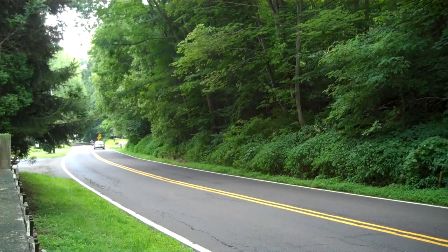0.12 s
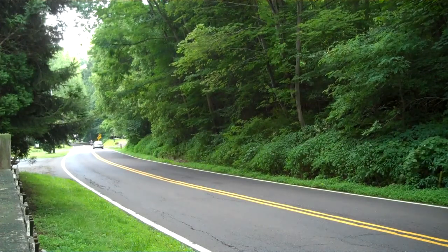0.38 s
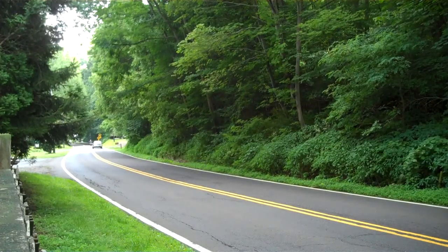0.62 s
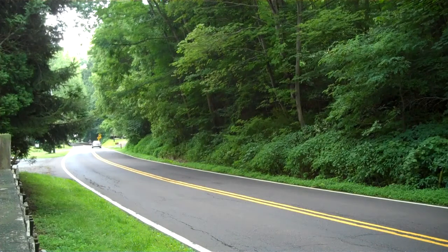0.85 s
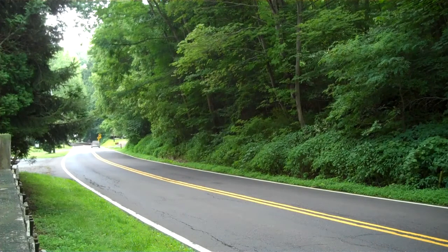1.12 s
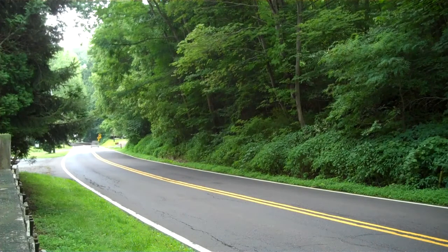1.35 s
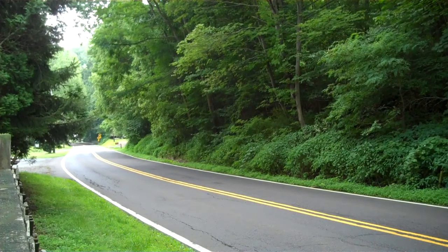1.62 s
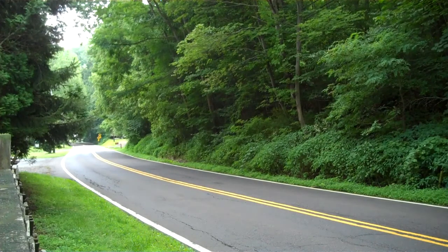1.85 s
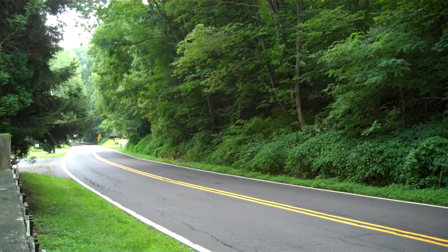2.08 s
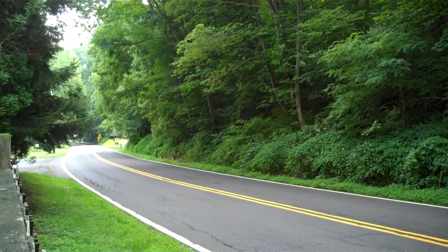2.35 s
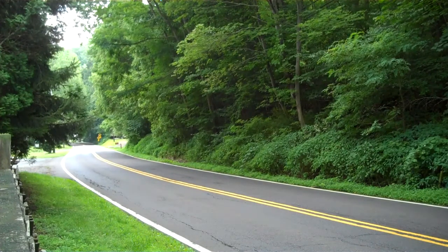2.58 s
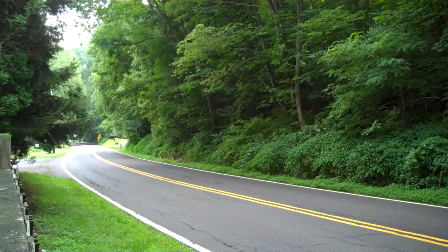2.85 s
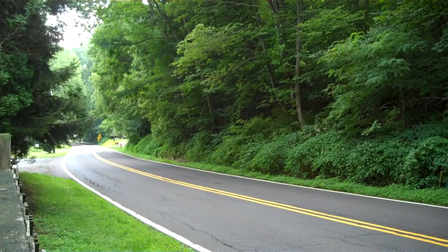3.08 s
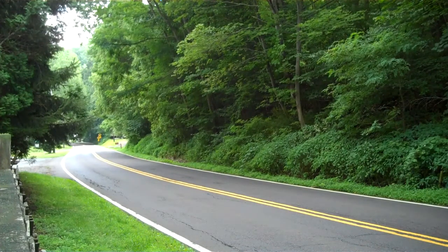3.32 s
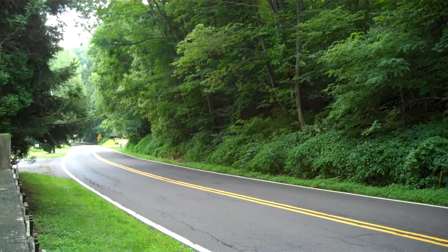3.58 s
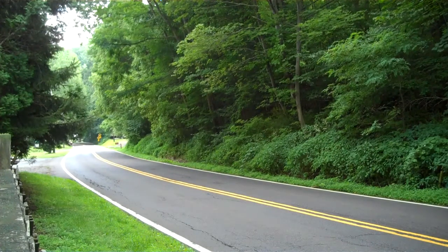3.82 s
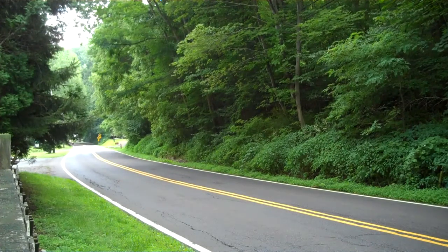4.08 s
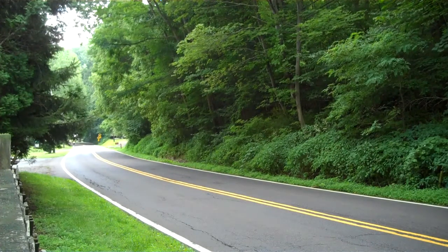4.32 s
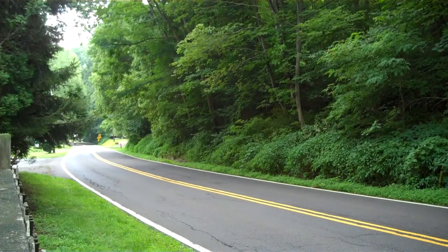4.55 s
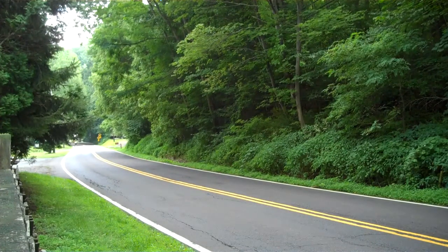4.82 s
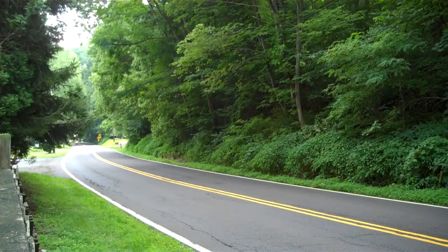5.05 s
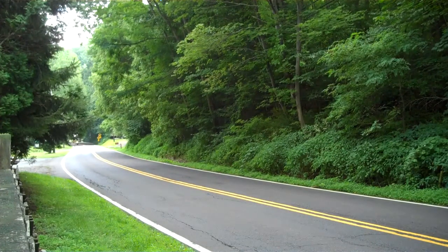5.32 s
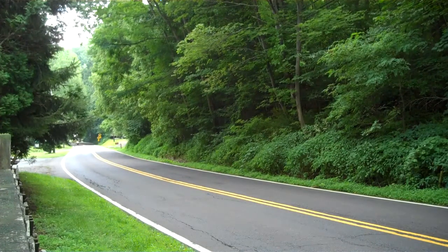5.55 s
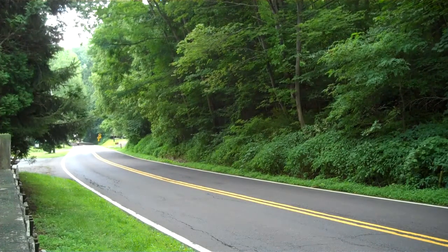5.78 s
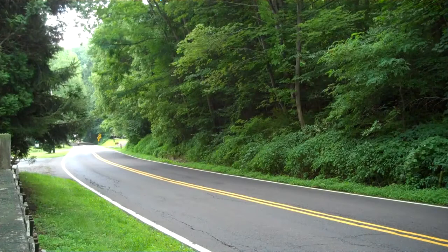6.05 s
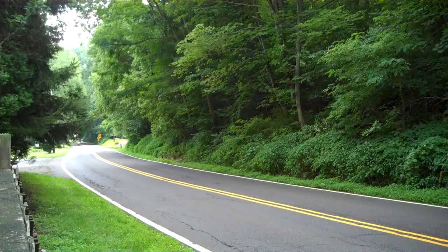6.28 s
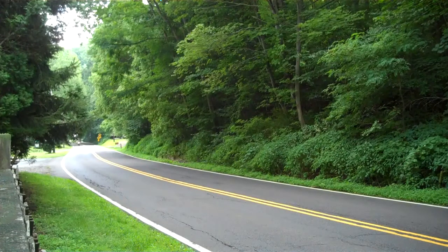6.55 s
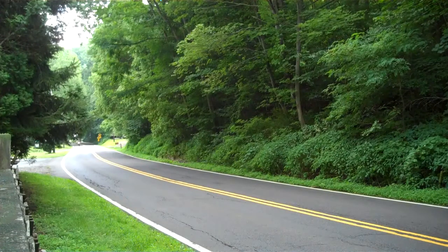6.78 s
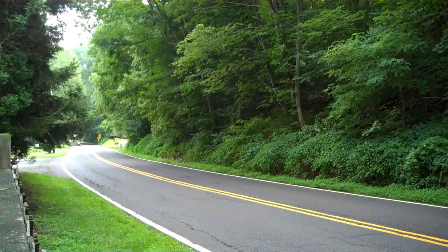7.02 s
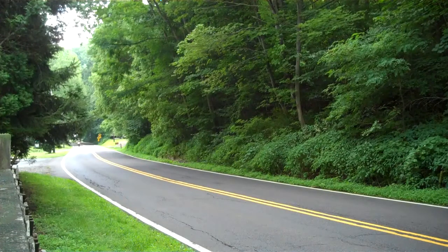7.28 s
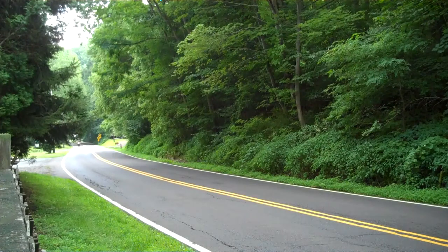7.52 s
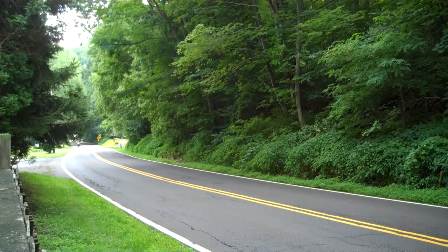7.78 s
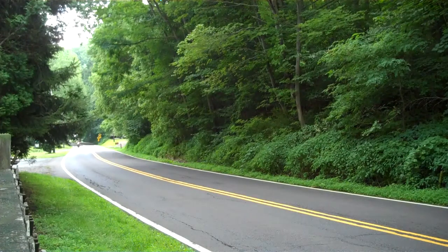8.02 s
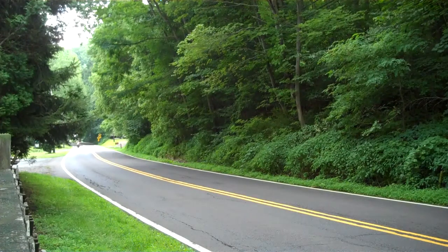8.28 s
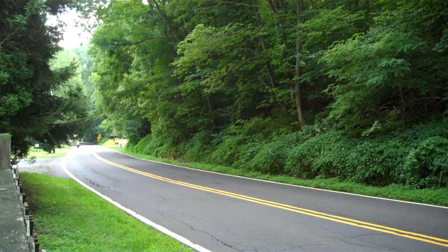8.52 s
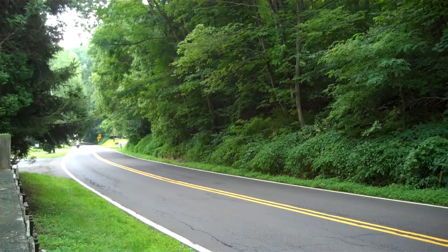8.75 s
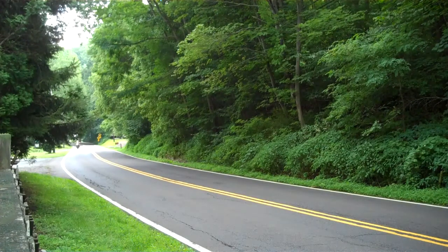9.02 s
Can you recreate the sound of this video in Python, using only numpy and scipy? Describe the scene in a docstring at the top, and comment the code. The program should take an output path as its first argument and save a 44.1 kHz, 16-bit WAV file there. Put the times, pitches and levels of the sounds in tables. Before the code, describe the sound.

A roadside in leafy woods, heard by a small fixed stereo microphone. From 0 s a car's tyres roar, a broad midrange wash around 1 to 2 kHz with bright spray near 6 to 8 kHz, low engine tones and a brief hum sliding slightly down. It sinks a little, then between 0.9 and 1.9 s crossfades away. Left is a steady high hiss of insects and leaves, slowly thinning, brighter in pitch on the left, over faint far rumble. A distant motorcycle drones at about 57 turns per second, wavering, pitch creeping up until 5 s then easing down. From about 4 s its roar and rumble swell, and gear whine emerges. A second, slower engine throbs low and uneven, clearly stronger by 5 s, its pitch peaking near 6 s. Both remain near the centre; the motorcycle is loudest from 8 to 9 s, still approaching when the sound ends.

```python
"""Tyres roar first, with a spray of treble, from a car on a wooded road, then crossfade into a second passage.
There a motorcycle and a second engine draw nearer: steady engine tones, made of sine waves, over a soft roar
and rumble of shaped noise. Insects and leaves hiss in two bands of noise that thin slowly, ringing at a
different pitch in each microphone port of a small stereo camera."""
import sys
import numpy as np
from scipy import signal
from scipy.fft import rfft, irfft
from scipy.io import wavfile
from scipy.ndimage import uniform_filter1d

SR = 44100
rng = np.random.default_rng(int(sys.argv[2]) if len(sys.argv) > 2 else 0)


def transcribe(u):
    """Save the signal u as a 16-bit wav file named by the first command-line argument.

    u: samples, shape (n,) or (channels, n), limited to [-1, 1]; the rate is SR.
    q: integer samples, one column per channel.
    """
    v = np.clip(np.atleast_2d(u).T, -1, 1)
    q = np.round(v * 32767).astype(np.int16)
    wavfile.write(sys.argv[1], SR, q)


def linear_from_db(decibels):
    """Turn decibels (scalar or array-like) into linear amplitude factors; 0 gives 1."""
    return 10 ** (np.asarray(decibels, float) / 20)


N = 402633
T = np.arange(N) / SR  # time of every sample [s]
F = np.maximum(np.arange(N // 2 + 1) * SR / N, 1)  # frequency of every spectrum bin [Hz]

# The passage with the car crossfades into the one with the woods and the engines.
FADE_START_S, FADE_END_S = 0.9, 1.91
# How each part rises in it: powers of the share done, 1 = straight.
RISE_LOW, RISE_HIGH, RISE_ENGINES = 1.2, 0.85, 0.95

# Tyre colour, shape only: (frequency [Hz], relative level [dB per Hz])
TYRE_COLOUR = [(30, -32.5), (60, -29), (130, -23.5), (230, -16), (350, -17.5), (590, -9.5), (780, -11.5),
               (900, -4), (1100, 1), (1300, -3), (1600, 1), (1850, -2), (2050, -8.5), (2800, -9),
               (3100, -13), (4200, -29.5), (5000, -51)]
TYRE_DB, TYRE_LOSS_DB_PER_S, TYRE_FADE_POWER = -33.5, 2, 1.03
# Treble spray of the car, ringing in the ports, before the crossfade:
# (frequency [Hz], left [dB per Hz], right [dB per Hz], likeness [0-1], lag of the left [radians])
SPRAY = [(3000, -92, -92, .5, 0), (3500, -76.7, -77.5, 0.59, -0.1), (4000, -77.8, -77.2, 0.35, 0.2),
         (4600, -74.0, -71.2, 0.13, 2.6), (5300, -71.6, -65.8, 0.21, 3.6), (5800, -68.8, -60.6, 0.14, 3.9),
         (6170, -65.0, -58.4, 0.24, 2.7), (6600, -60.6, -61.0, 0.33, 3.1), (7100, -56.5, -64.5, 0.23, 3.7),
         (7600, -56.5, -68.6, 0.2, 4.3), (8100, -64.0, -74.5, 0.22, 4.9), (8600, -73.9, -80.9, 0.22, 6.4),
         (9200, -80.0, -87.8, 0.24, 7.5), (9700, -85.7, -95.1, 0.03, 8.5),
         (10200, -95.3, -108.2, 0.08, 8.1), (10500, -125, -130, 0, 8.1)]
# Car engine tones: (multiple of CAR_HZ), then (level before the crossfade [dB])
CAR_HZ = 49.6
CAR_MULTIPLES = [1, 2, 3, 6, 7]
CAR_LINE_DB = [-74, -61, -68.5, -67, -62.5]
# A hum under the car that settles in pitch and dies early.
HUM_START_HZ, HUM_END_HZ, HUM_SETTLE_S = 124, 110, .33
HUM_DB, HUM_LOSS_DB_PER_S, HUM_STOP_S = -64, 10, 1.2

# Motorcycle shaft speed: (time [s], turns per second [Hz])
BIKE_HZ = [(1.2, 56.3), (1.7, 56.85), (2, 57.2), (2.45, 57.8), (3.15, 58.25), (3.85, 58.5), (4.55, 58.7),
           (4.9, 58.72), (5.25, 58.08), (5.6, 57.5), (5.95, 57.0), (6.3, 56.62), (6.65, 56.55), (7, 56.42),
           (7.35, 56.36), (7.7, 56.25), (8.4, 56.24), (9.13, 56.2)]
# Motorcycle nearness, scaled for each layer by its growth: (time [s], gain [dB])
BIKE_NEAR = [(1.2, -12), (2.5, -13), (3.4, -11), (4.2, -9.5), (4.8, -6), (5.5, -4.5), (6.3, -3.5),
             (7.4, -1.5), (7.8, -1.6), (8.5, -0.2), (9.13, 0.1)]
# The shaft's own tone; growth is dB gained per dB of nearness.
SHAFT_DB, SHAFT_GROWTH = -68, .3
# Exhaust tones: (multiple of the shaft speed), (level at 0 dB nearness [dB]), (growth [dB per dB])
EXHAUST_MULTIPLES = [2, 3, 4, 6, 8, 9]
EXHAUST_DB = [-58, -61.5, -71, -75.5, -80.5, -73]
EXHAUST_GROWTH = [0.17, .5, .6, .4, .7, 1]
# Swells and dips, one list per exhaust tone: (peak time [s], half length [s], change [dB])
EXHAUST_SWELLS = [
    [(2.6, 1.1, 2), (7.4, .5, 4.5), (8.3, 0.25, 5), (9.1, 0.26, 9.5)],
    [(4.8, 0.46, 3.5), (5.9, 0.46, 2.5), (7.0, .3, -4), (7.7, .3, 4), (8.35, 0.27, 8.5), (9.1, 0.45, 7.5)],
    [(2.9, .5, 8), (4.7, 0.95, 6.5), (6.3, .5, -11), (8.5, 0.74, 6.5)],
    [(2.4, 0.76, 8.5), (5.42, 1, 13), (8.1, 0.73, 12.5)],
    [(4.4, 0.99, 19.5), (7.0, .25, 7), (8.5, 0.66, 15)],
    [(6.3, 0.54, 10), (8.6, .6, 0)],
]
# Engine and chain tones that grow with the roar: (multiple of the shaft speed), (level over ROAR_DB [dB])
WHINE_MULTIPLES = [9.5, 13, 14, 15, 21.5, 32, 33, 34, 44]
WHINE_DB = [-24.5, -27, -22, -18.5, -19.5, -22, -28, -21.5, -27]
# Tones that clear only when close, the top ones from meshing teeth:
# (multiple of the shaft speed), (level over GEARS_DB at 0 dB nearness [dB])
GEAR_MULTIPLES = [5, 5.5, 7, 12, 22, 29, 30, 45]
GEAR_LINE_DB = [-8.5, -6, -8, -6, -6, -6, -0.5, 2]
GEARS_DB, GEAR_GROWTH = -60.5, 2.3
# Swells and dips, one list per gear tone: (peak time [s], half length [s], change [dB])
GEAR_SWELLS = [
    [],
    [],
    [(7.6, 0.28, 5.5)],
    [],
    [(7.1, .5, 8.5)],
    [(7.6, .4, 5), (8.7, .3, 3)],
    [(6.2, 0.34, 5)],
    [(7.3, 0.34, -3), (8.2, .5, 1.5)],
]
# Colour of the roar and rumble, shape only: (frequency [Hz], relative level [dB per Hz])
ROAR_COLOUR = [(24, -34), (40, -14.5), (112, -4.5), (254, -7.5), (296, -8.5), (1080, -10.5), (1210, -7.5),
               (1330, -9), (1670, -6), (2150, -8), (2500, -7), (2800, -12), (3800, -16.5), (4940, -44.5),
               (8360, -120)]
ROAR_DB, RUMBLE_DB, RUMBLE_GROWTH = -48, -51, 1.42  # levels at 0 dB nearness
RUMBLE_LEAD_S = 0.76  # the lows swell ahead of the roar

# Second engine, firing rate: (time [s], firings per second [Hz])
TRUCK_HZ = [(1.2, 68), (2.3, 68), (2.9, 67.2), (3.5, 67), (4.1, 67.4), (4.4, 68.3), (5, 70), (5.3, 71),
            (5.6, 73), (5.9, 74), (6.2, 72.3), (6.5, 72), (7.1, 70.3), (7.7, 69), (8.3, 68), (9.13, 67.1)]
# Second engine's nearness, scaled for each tone by its growth: (time [s], gain [dB])
TRUCK_NEAR = [(1.3, -21.5), (2.4, -16), (3.8, -12.5), (5, -2), (6.3, -0.5), (9.13, -.6)]
# Its main tones: (multiple of the firing rate), (level at 0 dB nearness [dB]), (growth [dB per dB])
TRUCK_MULTIPLES = [1, 1.5, 2]
TRUCK_DB = [-61.5, -70, -83]
TRUCK_GROWTH = [0.95, .1, .3]
# Swells and dips, one list per main tone: (peak time [s], half length [s], change [dB])
TRUCK_SWELLS = [
    [],
    [(1.75, .35, 11), (2.6, .2, -10), (3.25, 0.43, 9), (4.4, 0.38, 9), (5.7, 0.37, 11), (7.6, .4, 15),
     (8.95, .3, 9)],
    [(4.4, .3, 8), (8.9, 1.7, 22)],
]
# Its quarter tones: (multiple of the firing rate), (level over the first main tone [dB])
TRUCK_QUARTERS = [1.25, 1.75]
TRUCK_QUARTER_DB = [-5.5, -11.5]

# Hiss of insects and leaves, ringing in the ports, before it rises and thins:
# (frequency [Hz], left [dB per Hz], right [dB per Hz], likeness [0-1], lag of the left [radians])
WOODS_HISS = [(2700, -100, -100, .5, 0), (3200, -93, -92, .4, .3), (3700, -83.5, -82.5, .36, 1.4),
              (4100, -81.5, -80.5, .38, 1.6), (4650, -76, -74, .43, 1.6), (5300, -73.5, -70.5, .47, 1.9),
              (5650, -71.5, -67, .43, 1.8), (5880, -66.5, -61.5, .54, 1.5), (6170, -66.5, -60, .54, 1.2),
              (6400, -66, -64.5, .46, 1.1), (6700, -63.5, -68.5, .32, 1), (7020, -61.5, -70, .14, 3.3),
              (7140, -58, -69.5, .2, 3.5), (7660, -58.5, -71, .22, 3.8), (8050, -65.5, -77.5, .21, 4.1),
              (8600, -80.5, -88.5, .12, 3.8), (9500, -90, -112, .05, 3.7), (10100, -115, -125, 0, 4)]
# Gain of each chorus at the end of the crossfade, and its slow loss.
LOW_DB, LOW_SAG_DB_PER_S, HIGH_DB, HIGH_SAG_DB_PER_S = 0.82, 0.5354, .4, 0.22
# Colour of far rumble and air, shape only: (frequency [Hz], relative level [dB per Hz])
AIR_COLOUR = [(18, -42), (30, -12.5), (64, -8), (113, -3.5), (214, -16.5), (339, -5.5), (398, -11),
              (1130, -12.5), (1250, -20.5), (3130, -11), (3600, -13), (4680, -39), (7920, -120)]
AIR_DB = -60
# Preamplifier hiss: (frequency [Hz], left [dB per Hz], right [dB per Hz])
PREAMP_HISS = [(10100, -150, -150), (10370, -118, -113), (11500, -114, -108), (13200, -108, -106),
               (14000, -106, -105)]
BASS_TILT_DB = 1.5  # how much more bass the right port hears


def car():
    """Tyre noise sinking slightly, treble spray, engine tones, a short hum; faded out in the crossfade."""
    fade = 1 - crossfade_done()
    tyre_db = TYRE_DB - TYRE_LOSS_DB_PER_S * T + 0.25 * walk(10.3) + .5 * walk(6.1)
    tyres = linear_from_db(tyre_db) * wash(TYRE_COLOUR, 0.99, 800, 2300)
    engine = lines(np.full(N, CAR_HZ), CAR_MULTIPLES, CAR_LINE_DB, 1.5)
    spray = pair(*over_hz(SPRAY))
    hum_hz = HUM_END_HZ + (HUM_START_HZ - HUM_END_HZ) * np.exp(-T / HUM_SETTLE_S)
    hum = lines(hum_hz, [1], [HUM_DB - HUM_LOSS_DB_PER_S * T], 0.91)
    hum = hum * np.clip((HUM_STOP_S - T) / .15, 0, 1)  # the hum has a short fade of its own
    return tyres * fade ** TYRE_FADE_POWER + hum + fade * (engine + spray)


def motorcycle():
    """Clear tones at multiples of the shaft speed, over a roar that puffs a little on every turn."""
    hz, = curves(BIKE_HZ)
    near_db, = curves(BIKE_NEAR)
    shaft_db = SHAFT_DB + SHAFT_GROWTH * near_db
    exhaust_db = line_levels(EXHAUST_DB, EXHAUST_GROWTH, near_db, EXHAUST_SWELLS)
    exhaust = lines(hz, [1] + EXHAUST_MULTIPLES, [shaft_db] + exhaust_db, 1.4, 10.)
    whine = linear_from_db(ROAR_DB + near_db) * lines(hz, WHINE_MULTIPLES, WHINE_DB, 1.8, 6.6)
    gear_growth = np.full(len(GEAR_MULTIPLES), GEAR_GROWTH)
    gear_db = line_levels(GEAR_LINE_DB, gear_growth, near_db, GEAR_SWELLS)
    gears = linear_from_db(GEARS_DB) * lines(hz, GEAR_MULTIPLES, gear_db, 1.6, 8.)

    # One wash of noise, split so that its lows can swell ahead of the rest.
    rumble, roar = split(wash(ROAR_COLOUR, 0.92, 880, 3300), 520, 300)
    puff = 1 + 0.06 * np.sin(2 * np.pi * np.cumsum(hz) / SR)
    roar = linear_from_db(ROAR_DB + near_db + .4 * walk(10)) * puff * roar
    early_db = np.interp(T + RUMBLE_LEAD_S, T, near_db)
    rumble = linear_from_db(RUMBLE_DB + RUMBLE_GROWTH * early_db + .6 * walk(8)) * rumble
    return crossfade_done() ** RISE_ENGINES * (exhaust + whine + gears + roar + rumble)


def truck():
    """A second engine with uneven firing, so quarter tones show beside the main ones."""
    hz, = curves(TRUCK_HZ)
    near_db, = curves(TRUCK_NEAR)
    levels_db = line_levels(TRUCK_DB, TRUCK_GROWTH, near_db, TRUCK_SWELLS)
    main = lines(hz, TRUCK_MULTIPLES, levels_db, 1.2, 8.)
    quarters = linear_from_db(levels_db[0]) * lines(hz, TRUCK_QUARTERS, TRUCK_QUARTER_DB, 2.7)
    return crossfade_done() ** RISE_ENGINES * (main + quarters)


def woods():
    """Two choruses of hiss, a lower and a higher, each rising, then thinning and flickering alone."""
    since = T - FADE_END_S
    low, high = split(pair(*over_hz(WOODS_HISS)), 6750, 400)
    low_db = LOW_DB - LOW_SAG_DB_PER_S * since + 0.2 * walk(9)
    high_db = HIGH_DB - HIGH_SAG_DB_PER_S * since + 0.24 * walk(11)
    done = crossfade_done()
    return done ** RISE_LOW * linear_from_db(low_db) * low + done ** RISE_HIGH * linear_from_db(high_db) * high


def far_air():
    """Far rumble and air: coloured noise at a steady level throughout."""
    return linear_from_db(AIR_DB) * wash(AIR_COLOUR, 0.65)


def preamplifier():
    """Faint high electronic hiss, partly shared by the two channels."""
    return pair(*over_hz(PREAMP_HISS), 0.29, 0)


def crossfade_done():
    """Share of the crossfade that is done, 0-1."""
    return np.clip((T - FADE_START_S) / (FADE_END_S - FADE_START_S), 0, 1)


def lines(hz, multiples, levels_db, waver_db, rate=5.):
    """Sine waves at multiples of hz, rms 1 at 0 dB; the long air path makes each waver alone."""
    turns = np.cumsum(hz) / SR
    total = 0
    for multiple, db in zip(multiples, levels_db):
        wave = np.sin(2 * np.pi * (multiple * turns + rng.random()))
        total = total + linear_from_db(db + waver_db * walk(rate)) * wave
    return np.sqrt(2) * total


def line_levels(base_db, growth, near_db, swells):
    """Level of each tone: it grows with nearness and has its own bell-shaped swells and dips."""
    levels = []
    for base, grow, rows in zip(base_db, growth, swells):
        level = base + grow * near_db
        for peak, half, db in rows:
            level = level + db * np.exp(-((T - peak) / half) ** 2)
        levels.append(level)
    return levels


def wash(table, like, lo=0., hi=SR):
    """Coloured stereo noise with rms 1 between lo and hi Hz."""
    db = np.where(F > table[-1][0], -200, over_hz(table)[0])
    power = np.sum(linear_from_db(2 * db)[(F > lo) & (F < hi)]) * SR / N
    return pair(db, db, like, 0) / np.sqrt(power)


def pair(left_db, right_db, like, lag):
    """Two noises that share a part, the left one lagging in phase."""
    like = np.clip(like, 0, 1)
    right = white()
    left = like * right * np.exp(-1j * lag) + np.sqrt(1 - like ** 2) * white()
    return irfft(np.array([left * linear_from_db(left_db), right * linear_from_db(right_db)]), N)


def white():
    """Spectrum of noise at 0 dB per Hz."""
    return rfft(rng.standard_normal(N)) * np.sqrt(SR / 2)


def walk(rate):
    """Random levels, each held 1 / rate s, then smoothed twice; spread near 1."""
    hold = int(SR / rate)
    steps = np.repeat(rng.standard_normal(N // hold + 1), hold)
    return 1.3 * uniform_filter1d(uniform_filter1d(steps, hold), hold)[:N]


def split(x, hz, width):
    """Parts of x below and above hz, crossing over within width Hz."""
    low = irfft(rfft(x) * np.clip(.5 - (F - hz) / width, 0, 1), N)
    return low, x - low


def curves(table):
    """Columns of a table at every sample."""
    s, *columns = np.transpose(table)
    return [np.interp(T, s, column) for column in columns]


def over_hz(table):
    """Columns of a table at every bin, straight on a log frequency axis."""
    hz, *columns = np.transpose(table)
    return [np.interp(np.log(F), np.log(hz), column) for column in columns]


def scene():
    """All sources; the road is straight ahead, so it is nearly alike in both ports."""
    return car() + motorcycle() + truck() + woods() + far_air()


def roll_off(x):
    """The treble ends steeply here."""
    return signal.sosfilt(signal.butter(12, 14190, fs=SR, output="sos"), x)


def record(dry):
    """The right port hears a little more bass; the preamplifier adds its faint high hiss."""
    bass, rest = split(dry, 250, 400)
    tilt = linear_from_db(np.array([[-.5], [.5]]) * BASS_TILT_DB)  # left down, right up
    mix = rest + bass * tilt + preamplifier()
    return roll_off(mix)


dry = scene()
out = record(dry)
transcribe(out)
```